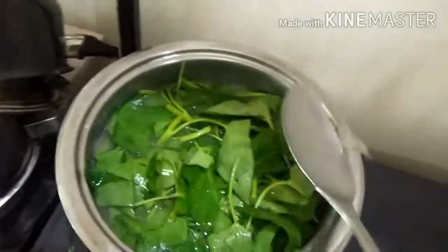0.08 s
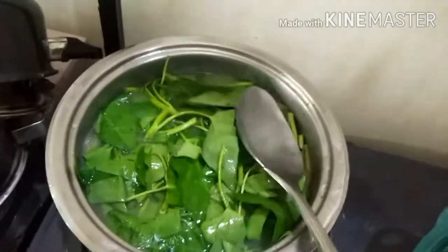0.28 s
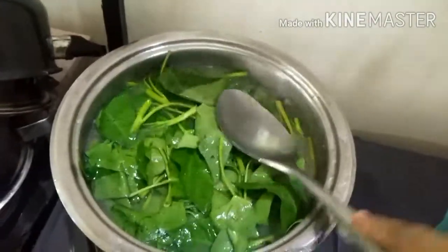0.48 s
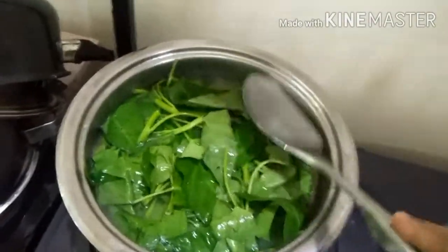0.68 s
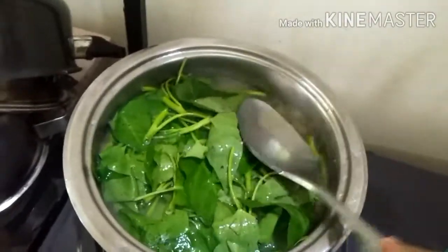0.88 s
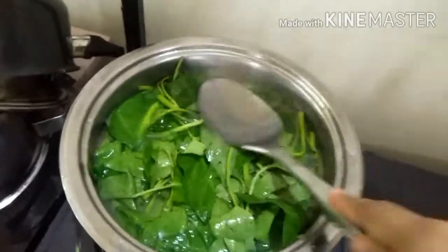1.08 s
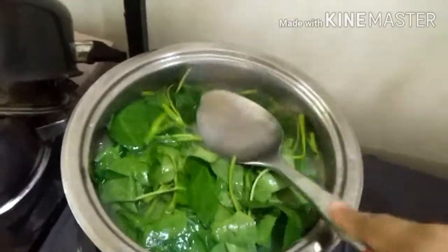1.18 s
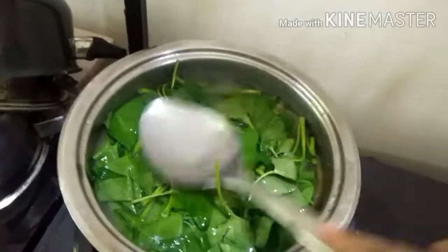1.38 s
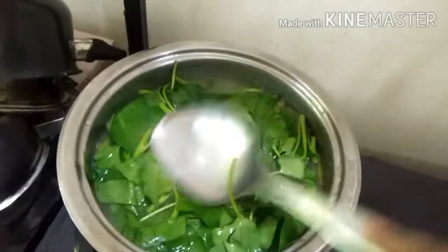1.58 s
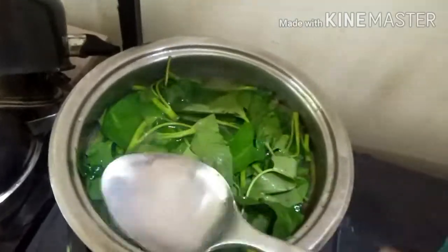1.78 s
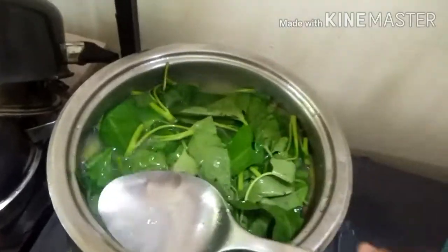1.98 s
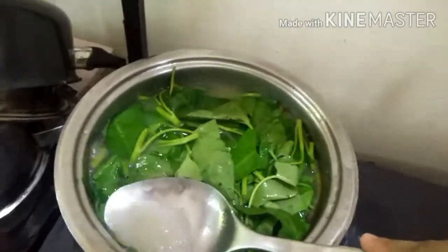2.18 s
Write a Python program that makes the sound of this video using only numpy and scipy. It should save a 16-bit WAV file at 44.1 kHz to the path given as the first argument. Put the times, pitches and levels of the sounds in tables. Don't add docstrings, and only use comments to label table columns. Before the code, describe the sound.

A steel ladle knocks on a steel soup pot: a bright double clink with small bounces at 0.22 s, a longer, clearer clang at 0.77 s, and a short sharp clank at 1.89 s. Between them wet leaves tick and stalks snap dully, busiest at 1.0-1.55 s and again at 2.0-2.2 s. Faint flame and simmer hiss swells and drops with a phone's noise gate, close and dry.

```python
import sys
import numpy as np
from scipy import signal
from scipy.io import wavfile

SR = 44100
rng = np.random.default_rng(int(sys.argv[2]) if len(sys.argv) > 2 else 0)


def nominal_scale(level):
    x = np.asarray(level, float) / 20
    return 10 ** x


def transcribe(signal):
    frames = np.atleast_2d(signal).T
    limited = np.clip(frames, -1, 1)
    pcm = np.round(limited * 32767).astype(np.int16)
    wavfile.write(sys.argv[1], SR, pcm)


N = 97020
T = np.arange(N) / SR


def rms_one(x):
    return x / np.sqrt(np.mean(x ** 2) + 1e-20)


def at_hz(points, hz):
    table_hz, value = np.transpose(points)
    return np.interp(np.log(hz), np.log(table_hz), value)


def filtered(x, order, hz, kind="low"):
    return signal.sosfilt(signal.butter(order, hz, kind, fs=SR, output="sos"), x)


def split_at(x, order, hz):
    low = signal.sosfiltfilt(signal.butter(order, hz, fs=SR, output="sos"), x)
    return low, x - low


def wander(values, step):
    return np.interp(np.arange(N) / step, np.arange(len(values)), values)


def ring(clicks, hz, t60_s):
    r, w = nominal_scale(-60 / (t60_s * SR)), 2 * np.pi * hz / SR
    return signal.lfilter([0, np.sin(w)], [1, -2 * r * np.cos(w), r * r], clicks + 1e-18)


def peak(x, hz, width_hz):
    r = np.exp(-np.pi * width_hz / SR)
    feedback = [1, -2 * r * np.cos(2 * np.pi * hz / SR), r * r]
    return signal.lfilter([(1 - r * r) / 2, 0, (r * r - 1) / 2], feedback, x)


def dying(start_s, t60_s):
    swell_s = 0.0007
    out, first = np.zeros(N), int(start_s * SR)
    age_s = T[first:int((start_s + 1.5 * t60_s) * SR)] - T[first]
    out[first:first + len(age_s)] = (1 - np.exp(-age_s / swell_s)) * nominal_scale(-60 * age_s / t60_s)
    return out


def noise_bands():
    edges_hz = 30 * 2 ** np.arange(0, 9.2, 1 / 3)
    white = rng.standard_normal((2, N))
    return [(np.sqrt(a * b), filtered(white[k % 2], 2, [a, b], "band"))
            for k, (a, b) in enumerate(zip(edges_hz, edges_hz[1:]))]


# frequency in Hz, level in dB per Hz.
HISS_SPECTRUM = [(40, -9), (140, 3), (1000, -11), (3500, -18), (8500, -13.5), (10500, -12), (12500, -28.5),
                 (16000, -30.5)]
# centre in Hz, width in Hz, added level in dB.
HISS_RESONANCES = [(1010, 83, 0.5), (5400, 570, -13)]


def flame_and_simmer():
    level_db, flicker_db, grain_db = -59, 1, 2.3
    edge_hz, above_edge_db = 10700, -7
    flicker_step, grain_step = 800, 130
    grain = wander(rng.standard_normal(N // grain_step + 2), grain_step)
    out = np.zeros(N)
    for hz, band in noise_bands():
        flicker = wander(rng.standard_normal(N // flicker_step + 2), flicker_step)
        band_db = at_hz(HISS_SPECTRUM, hz) + flicker_db * flicker + grain_db * grain * (hz > 1000)
        out += nominal_scale(band_db) * band
    out = out + sum(nominal_scale(db) * peak(out, hz, width_hz) for hz, width_hz, db in HISS_RESONANCES)
    low, high = split_at(out, 8, edge_hz)
    return nominal_scale(level_db) * rms_one(low + nominal_scale(above_edge_db) * high)


def fine_crackle():
    ticks_per_s, level_db, spread_db = 450, -63, 3.6
    sizes = nominal_scale(level_db + spread_db * np.minimum(rng.exponential(1, N), 4))
    sizes = sizes * (rng.random(N) < ticks_per_s / SR)
    dealt = rng.integers(0, 12, N)
    return sum(ring(sizes * (dealt == k), hz, 1.7 / hz) for k, hz in enumerate(np.geomspace(2500, 13000, 12)))


def wet_pops(events, voice):
    cycles, click_db, puff_db, puff_t60_s, ratio = voice
    out, puff_noise = np.zeros(N), rng.standard_normal(N)
    for start_s, db, hz in events:
        click = np.zeros(N)
        click[int(start_s * SR)] = nominal_scale(db)
        wide_hz = [hz / ratio, min(hz * ratio, 15000)]
        near_hz = [hz / ratio ** 0.65, min(hz * ratio ** 0.55, 14000)]
        edge = filtered(click + 1e-18, 2, wide_hz, "band")
        out += filtered(ring(click, hz, cycles / hz), 2, wide_hz, "band")
        out += nominal_scale(db + click_db) * edge / np.abs(edge).max()
        puff = rms_one(filtered(puff_noise, 2, near_hz, "band"))
        out += nominal_scale(db + puff_db) * puff * dying(start_s, puff_t60_s)
    return filtered(out, 2, 12500)


# start in seconds, peak in dB, centre in Hz.
LEAF_TICKS = [(.05, -52, 7060), (.174, -45, 9000), (0.3876, -55, 5960), (0.3892, -41.5, 8100),
              (0.3933, -49, 5050), (0.415, -49, 4430), (.432, -65, 5200), (.4537, -47, 9000),
              (0.4822, -53, 6000), (0.4917, -51, 6000), (0.5094, -42.5, 7600), (0.5502, -54, 7200),
              (0.576, -42, 5000), (.581, -58, 11500), (0.605, -47.5, 5200), (.6114, -48, 9500),
              (.8245, -36, 6540), (.8413, -41.5, 5000), (.886, -50, 12500), (.8918, -42, 8600),
              (.9121, -43.5, 9900), (0.9225, -42.5, 8200), (0.9946, -47, 11000), (1.0088, -31, 9900),
              (1.0089, -34, 5020), (1.0117, -54, 9600), (1.0155, -42, 11400), (1.1233, -41, 10000),
              (1.1343, -46.5, 5700), (1.1719, -41, 5060), (1.1721, -42, 8800), (1.1783, -48, 8000),
              (1.1864, -39.5, 7200), (1.2029, -43, 10500), (1.2191, -50, 6800), (1.228, -65, 10500),
              (1.245, -64, 12000), (1.2563, -36.5, 9700), (1.2836, -47, 10500), (1.3068, -56, 9150),
              (1.3222, -48, 10400), (1.348, -50, 11000), (1.3552, -47.5, 5170), (1.378, -44, 10500),
              (1.4454, -54, 8750), (1.4549, -40.5, 7960), (1.4992, -42.5, 6040), (1.5096, -35, 8900),
              (1.5202, -41.5, 5040), (1.5229, -32, 9150), (1.5284, -38, 8600), (1.6107, -50, 9040),
              (1.764, -54.5, 4150), (1.793, -55, 11300), (1.8123, -72, 8900), (1.982, -47, 4830),
              (2.0109, -46, 7500), (2.0159, -43.5, 4960), (2.0803, -38.5, 9000), (2.113, -46, 9900),
              (2.1255, -52.5, 5570),
    (2.1307, -57, 8700),
    (2.146, -52, 8900),
    (2.1529, -38.5, 9100),
    (2.1539, -47, 5500),
    (2.1622, -46, 8900),
    (2.181, -65, 12200),
]
# ring in cycles, click in dB, puff in dB, puff t60 in seconds, click width as a pitch ratio.
LEAF_TICK_VOICE = (32.0, 2.0, -5, .015, 1.7)


def leaf_ticks():
    return wet_pops(LEAF_TICKS, LEAF_TICK_VOICE)


# start in seconds, peak in dB, centre in Hz.
STALK_SNAPS = [(.0618, -43, 1200), (.4153, -48, 2580), (.278, -42, 1170), (.302, -44, 1330),
               (.5102, -44, 1460), (.553, -43.5, 1440), (.557, -44.5, 970), (.5733, -45, 1480),
               (.576, -40.5, 2010), (.946, -48, 900), (1.0024, -32.5, 1630), (1.0088, -31, 3020),
               (1.1615, -46, 2700), (1.1719, -47, 2170), (1.209, -43.5, 2030), (1.306, -47.5, 1060),
               (1.309, -52, 676), (1.317, -50, 1000), (1.472, -48, 1800), (1.516, -40, 1680),
               (1.5205, -67, 2900), (1.523, -35.5, 2710), (1.5284, -44.5, 1620), (1.7472, -41.5, 990),
               (1.768, -43.5, 978), (1.789, -44, 1780), (2.016, -41, 1097), (2.0477, -54, 1610),
               (2.0812, -46.5, 1420), (2.111, -48, 726), (2.1228, -41, 1080), (2.13, -39, 3130)]
# ring in cycles, click in dB, puff in dB, puff t60 in seconds, click width as a pitch ratio.
STALK_SNAP_VOICE = (12.0, 1.5, -18, 0.09, 2.8)


def stalk_snaps():
    return wet_pops(STALK_SNAPS, STALK_SNAP_VOICE)


# mode frequency in Hz, partial level in dB.
PARTNER_LEVELS = [(300, -14), (1000, -8), (2100, -13), (5000, -11), (7100, -10), (9000, -7), (13000, -6)]


def steel_mode(hz, first_s, t60_s, energy):
    waver_step_s, waver_db, waver_turns, waver_onset_s = 0.011, 3.5, 0.12, 0.04
    spread_hz, fade, fade_floor_db = 95, 0.4, -2.5
    on = energy > 0
    t, age_s = T[on], T[on] - first_s
    off_hz = spread_hz * (hz / 5000) ** 0.55 * rng.uniform(0.2, 1.8, 7) * [0, 1, -1, 1, -1, 1, -1]
    turn = rng.random(7)
    steps = rng.standard_normal((2, int(T[-1] / waver_step_s) + 2))
    onset = np.minimum(age_s / waver_onset_s, 1)
    sway, slip = (np.interp(t / waver_step_s, np.arange(len(v)), v) * onset for v in steps)
    turns = (hz + off_hz)[:, None] * t + turn[:, None] + waver_turns * slip
    waves = nominal_scale(waver_db * sway) * np.sin(2 * np.pi * turns)
    fade_db = np.maximum(-60 * fade * age_s / t60_s, fade_floor_db)
    cluster = waves[0] + nominal_scale(at_hz(PARTNER_LEVELS, hz) + fade_db) * waves[1:].sum(axis=0)
    out = np.zeros(N)
    out[on] = np.sqrt(energy[on]) * cluster
    return out


# frequency in Hz, t60 in seconds.
CLANG_TAIL_T60 = [(100, 0.93), (1000, 0.559), (5000, 0.35), (15000, 0.047)]


def steel_clang(touch_s, touch_db, spectrum, quick_t60_s, tail_db, noise):
    coloured = np.array([nominal_scale(at_hz(spectrum, hz)) * band for hz, band in noise])
    coloured /= coloured.sum(axis=0).std()
    quick = np.sqrt(sum((nominal_scale(db) * dying(s, quick_t60_s)) ** 2 for s, db in zip(touch_s, touch_db)))
    tail = sum(band * dying(touch_s[0], at_hz(CLANG_TAIL_T60, hz)) for (hz, _), band in zip(noise, coloured))
    return quick * coloured.sum(axis=0) + nominal_scale(touch_db.max() + tail_db) * tail


def knock(touches, modes_hz, modes, clang_spectrum, levels, noise):
    touch_s, touch_db, tilt_db = np.transpose(touches)
    clang_db, quick_t60_s, tail_db, held_db, held_t60_s = levels
    scatter_db = 1.5
    out = np.zeros(N)
    for hz, (mode_db, t60_s) in zip(modes_hz, modes):
        strike_db = touch_db + mode_db + tilt_db * np.log2(np.abs(hz - 2060) / 5000 + 0.35)
        strike_db = strike_db + scatter_db * rng.standard_normal(len(touch_s))
        energy = np.zeros(N)
        for s, db in zip(touch_s, strike_db):
            free = dying(s, t60_s)
            held = nominal_scale(held_db) * dying(s, held_t60_s)
            energy += nominal_scale(2 * db) * (free ** 2 + held ** 2)
        out += steel_mode(hz, touch_s[0], t60_s, energy)
    return out + nominal_scale(clang_db) * steel_clang(touch_s, touch_db, clang_spectrum, quick_t60_s, tail_db, noise)


# start in seconds, level in dB, brightness in dB per octave.
TOUCHES_1 = [
    (0.2174, -24, 5),
    (0.2216, -24.5, 3),
    (0.2253, -35.5, 2.5),
    (0.2328, -30.5, -5),
    (0.253, -45.5, 0),
    (0.2702, -37.5, 5.5),
    (0.272, -43, -6),
    (0.2853, -44, 7),
]
# start in seconds, level in dB, brightness in dB per octave.
TOUCHES_2 = [
    (.7682, -26, .1),
    (0.771, -24.5, .1),
    (0.779, -36, .1),
    (0.785, -34, -0.5),
    (0.82, -45, 1.7),
    (0.859, -56.5, 0.5),
]
# start in seconds, level in dB, brightness in dB per octave.
TOUCHES_3 = [
    (1.8879, -33.5, 4.5),
    (1.8889, -26.5, 0.6),
    (1.905, -40.5, -9.5),
    (2.0153, -51, -5.5),
]
MODES_1_HZ = [975, 2073, 4850, 5250, 1090, 7190, 7930, 8371, 9087, 9415, 9640, 10610, 11100, 11650]
MODES_2_HZ = [430, 1050, 2064, 2190, 2250, 7120, 7940, 8382, 8470, 9260, 9640, 10365, 10990, 13300]
MODES_3_HZ = [295, 940, 2062, 5200, 7130, 1090, 7897, 8355, 8705, 9356, 9878, 10550, 10870, 13315]
# strength in dB, t60 in seconds.
MODES_1 = [(-16.5, 0.14), (-19.5, 0.2), (-10.5, 0.034), (-6, 0.028), (-16.5, 0.043), (-12.5, 0.15),
           (-15, 0.15), (-16, 0.2), (-10.5, 0.071), (-4, 0.071), (-16, .08), (-12.5, 0.074), (-13, 0.062),
           (-20.5, 0.035)]
MODES_2 = [(-25, 0.34), (-26, 0.32), (1, 0.1), (-0.5, 0.1), (-6.5, 0.0985), (-3, 0.11), (-13, 0.23),
           (-9.5, 0.12), (-15, 0.073), (-11.5, 0.19), (-12, 0.0885), (-9, 0.14), (-25, .12), (-12.5, 0.054)]
MODES_3 = [(-19, 0.16), (-19, 0.23), (-14.5, 0.19), (0.5, 0.013), (0, 0.1), (-17, 0.13), (-22, 0.38),
           (-9.5, 0.068), (-16, 0.21), (-9, 0.051), (-20, 0.22), (-15.5, 0.12), (-17, 0.22), (-17, 0.16)]
# frequency in Hz, level in dB per Hz.
CLANG_1 = [(47, -42.5), (80, -7), (980, -17), (3790, -15.5), (5170, -17), (5770, -9.5), (9400, 0.5),
           (16000, -27.5)]
CLANG_2 = [(47, -59.5), (80, -12), (1630, -7), (2130, -7), (2840, -12.5), (7050, -7.5), (10700, -7),
           (16000, -40.5)]
CLANG_3 = [(47, -40), (200, -6.5), (980, -5.5), (3500, -12), (6000, -5), (8000, 1.5), (13700, -3.5),
           (16000, -30)]
# clang in dB, its quick t60 in seconds, tail in dB below it,
# extra mode strength in dB while ladle and rim touch, t60 of that in seconds.
KNOCK_LEVELS = [
    (-0.5, 0.039, -16.5, 7, 0.0054),
    (-8, 0.13, -9.5, -10.5, 0.036),
    (3.5, 0.024, -14.5, 10, 0.01),
]


def ladle_knocks():
    noise = noise_bands()
    first = knock(TOUCHES_1, MODES_1_HZ, MODES_1, CLANG_1, KNOCK_LEVELS[0], noise)
    second = knock(TOUCHES_2, MODES_2_HZ, MODES_2, CLANG_2, KNOCK_LEVELS[1], noise)
    third = knock(TOUCHES_3, MODES_3_HZ, MODES_3, CLANG_3, KNOCK_LEVELS[2], noise)
    return first + second + third


def scene():
    leaves = fine_crackle() + leaf_ticks() + stalk_snaps()
    return (flame_and_simmer() + leaves + ladle_knocks())[None]


# opens in seconds, shuts in seconds, gain at start in dB, gain at end in dB.
GATE_OPENINGS = [(0.047, 0.08, -15.5, -17), (0.219, 0.37, 0, -2.5), (0.382, 0.434, -6, -4),
                 (0.43, .462, -12, -19), (0.481, 0.535, -9, -12.5), (0.548, 0.62, -1.5, -6.5),
                 (0.717, 0.755, -12.5, -17.5), (0.765, 0.962, -2, -3.5), (0.991, 1.043, -5, -5),
                 (1.073, 1.096, -12.5, -20), (1.13, 1.152, -16, -13), (1.163, 1.243, -3.5, -1),
                 (1.281, 1.298, -11, -8.5), (1.307, 1.368, 2.5, -6.5), (1.449, 1.45, -10, -18),
                 (1.456, 1.556, -4, -1.5), (1.609, 1.622, -15.5, -9.5), (1.748, 1.813, -5, 0),
                 (1.886, 1.996, 0.5, -2), (2.001, 2.01, -9, -4), (2.013, 2.176, -1, 4),
                 (2.179, 2.24, -5, 6)]


def gate_gain_db():
    shut_db, open_s, close_s, shortest_s = -18, 0.002, 0.011, 0.004
    out = np.full(N, float(shut_db))
    for a, b, start_db, end_db in GATE_OPENINGS:
        b = max(b, a + shortest_s)
        opening = np.interp(T, [a - open_s, a, b, b + close_s], [shut_db, start_db, end_db, shut_db])
        out = np.maximum(out, opening)
    return out


def low_pass(x):
    return signal.sosfilt(signal.butter(12, 16580, fs=SR, output="sos"), x)


def record(dry):
    treble_hz, treble_share, top_hz = 10800, 0.3, 16900
    gain_db = gate_gain_db()
    low, high = split_at(dry, 4, treble_hz)
    x = nominal_scale(gain_db) * (low + nominal_scale(treble_share * np.minimum(gain_db, 0)) * high)
    x = filtered(x, 1, 40, "high")
    x = signal.sosfilt(signal.cheby2(10, 60, top_hz, fs=SR, output="sos"), x)
    return low_pass(x)


dry = scene()
out = record(dry)
transcribe(out)
```